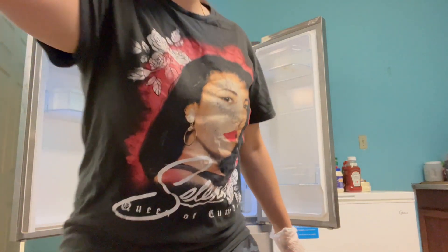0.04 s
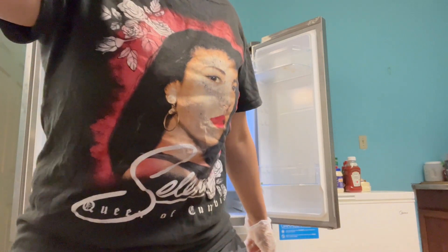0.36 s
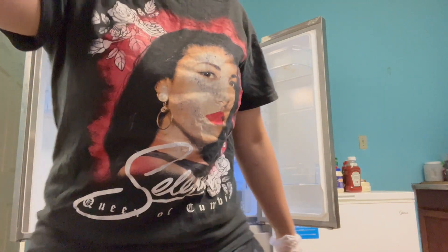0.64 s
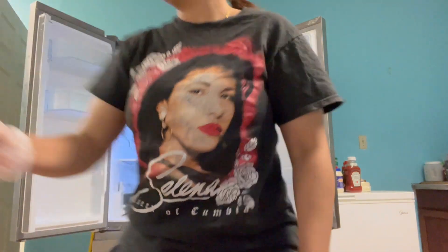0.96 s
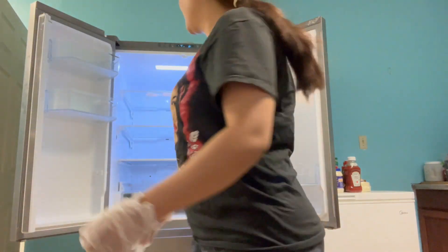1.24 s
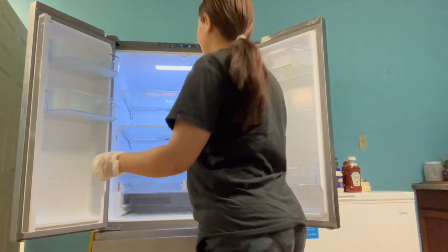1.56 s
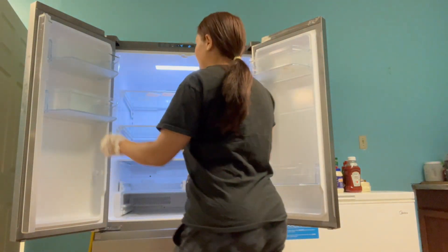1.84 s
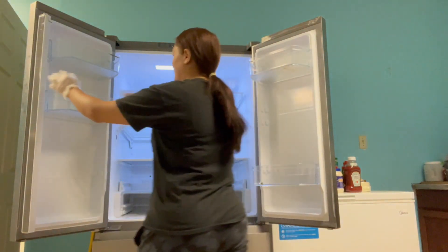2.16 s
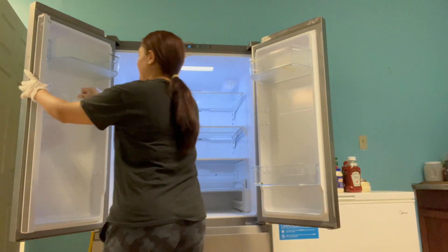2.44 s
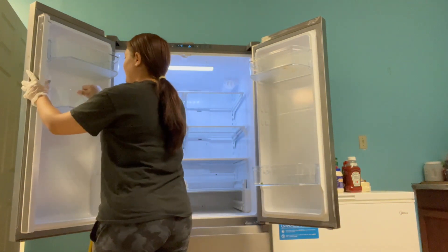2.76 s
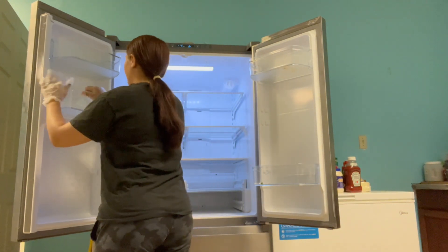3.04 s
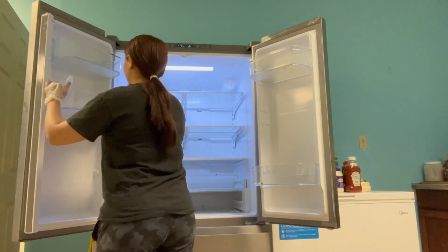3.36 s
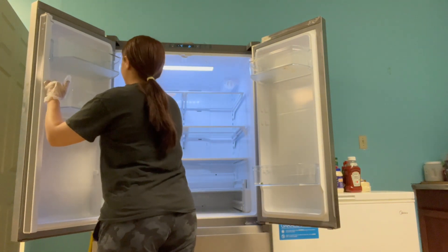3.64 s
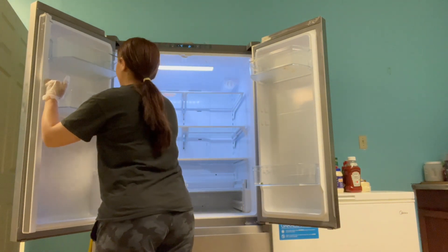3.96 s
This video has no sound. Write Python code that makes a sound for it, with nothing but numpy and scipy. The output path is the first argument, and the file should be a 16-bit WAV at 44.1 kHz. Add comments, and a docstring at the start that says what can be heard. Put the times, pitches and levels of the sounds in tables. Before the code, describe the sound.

An open refrigerator door thumps and its plastic bins rattle in a small, quiet kitchen. A shirt rustles and the microphone is bumped, then comes one loud jolt, shelf clacks and a run of knocks and crunches over faint humming.

```python
"""A shirt rustles close by; then, with a faint ping, a tap and a thud, a released camera rocks on its stand.
In the quiet kitchen someone goes to an open refrigerator and tugs at a plastic door bin.
Each jolt excites the low modes of the hollow door, while its bins knock, snap, crunch and rattle
and a shelf clacks into its slot. The small hard room reverberates and the compressor hums."""
import sys
import numpy as np
from scipy import signal
from scipy.fft import rfft, irfft
from scipy.io import wavfile

SR = 44100
rng = np.random.default_rng(int(sys.argv[2]) if len(sys.argv) > 2 else 0)


def persist_wave(psi):
    """Save psi, clipped to +-1, as 16-bit WAV."""
    counts = np.round(np.clip(psi, -1, 1) * 32767).astype(np.int16)
    wavfile.write(sys.argv[1], SR, np.atleast_2d(counts).T)


N = 176400

# jolts of the door, though the first row is the camera settling on its stand with a soft thump: t/s, rise/s,
# hold/s, then level/dB of bass, body, clatter and treble
THUMPS = [(.498, 0.0069, 0.019, -32, -38, -44.5, -57), (1.176, 0.0038, 0.062, -16.5, -16, -21.5, -39),
          (1.26, 0.006, 0.017, -22, -19.5, -28.5, -48.5), (1.42, 0.033, 0.082, -33.5, -37.5, -51.5, -69),
          (2.717, 0.0043, 0.033, -17, -15, -18, -34.5), (2.767, 0.0056, 0.022, -21.5, -20.5, -29, -46),
          (2.868, 0.0042, 0.076, -29.5, -20, -33.5, -53), (3.053, 0.0051, 0.029, -27.5, -27.5, -43.5, -59),
          (3.236, 0.0041, 0.034, -46, -23.5, -39.5, -57), (3.298, 0.0063, 0.051, -25, -22, -29, -44.5),
          (3.433, 0.00412, 0.02, -30.5, -31, -43, -47), (3.577, 0.03, .008, -31, -28, -33.5, -39.5),
          (3.622, 0.013, 0.04, -20, -16, -24, -37), (3.679, 0.0033, 0.038, -32, -21, -27.5, -56),
          (3.793, 0.006, 0.059, -35, -27.5, -39, -58), (3.894, 0.0059, 0.034, -31.5, -30, -39, -59.5)]
# decay of those four bands: T60/s
THUMP_T60 = [0.22, 0.28, 0.19, 0.19]
# crossovers between them: f/Hz
THUMP_SPLITS = [193, 730, 3050]
# spectrum of the door: f/Hz, level/dB
DOOR_SPECTRUM = [(30, -41.5), (58, -13.5), (108, -3.5), (165, -7), (245, -4.5), (540, -9), (1100, -17.5),
                 (1900, -28), (2400, -29), (2950, -35), (3800, -36), (6400, -37.5), (7400, -50),
                 (12500, -50), (15500, -80)]
# modes of the door panel: f/Hz, level/dB, T60/s
DOOR_MODES = [(111.2, 2, 0.59), (182.8, -4, 1), (306.8, 5, 0.68), (378.5, -7.5, 0.49), (495.4, 0, 0.24),
              (625, -20, 0.31), (780, -9, 0.47), (871, 0.5, 0.53)]
# knocks of the bin in its seat: t/s, level/dB, f/Hz, T60/s
KNOCKS = [(1.186, -16, 268.7, 0.25), (2.586, -21.5, 315, 0.17), (2.772, -17.5, 311.3, 0.4),
          (2.872, -18, 379, 0.33), (3.24, -12, 398, 0.14), (3.686, -12, 302.9, 0.32)]
# partials of a knock: frequency ratio, level/dB
KNOCK_PARTIALS = [(1.001, -0.5), (1.47, -13.5), (1.81, -13)]
# clacks of the shelf: t/s, level/dB
CLACKS = [(2.408, -24.5), (2.585, -22)]
# modes of the shelf: f/Hz, level/dB
SHELF_MODES = [(638, 0), (790, 2), (870, 2.5), (1080, 0.5), (1300, -4.5)]
# crunches of the bin on its rail: t/s, length/s, level/dB
CRUNCHES = [(1.225, .014, -27.5), (2.671, 0.043, -32.5), (3.302, 0.029, -34), (3.631, 0.045, -23.5),
            (3.779, 0.019, -41)]
# spectrum of a crunch: f/Hz, level/dB
CRUNCH_SPECTRUM = [(600, -18), (1540, 1), (1850, -14), (2120, 0.5), (2520, -3.5), (3000, -17.5),
                   (15000, -38)]
# plastic snaps: t/s, T60/s, then level/dB of body, clatter, treble and top
SNAPS = [(0.4384, 0.016, -11, -28, -53, -70), (0.495, 0.072, -42, -26.5, -58, -58),
         (1.167, 0.16, -33, -24.5, -30, -43), (2.0104, 0.013, -29.5, -26, -23.5, -30),
         (2.298, 0.27, -42, -44.5, -47.5, -58), (2.406, 0.2, -26, -22.5, -32, -44),
         (2.581, 0.11, -21.5, -19, -29, -32), (2.903, 0.089, -37, -26, -37, -46.5)]
# spectrum of a snap: f/Hz, level/dB
SNAP_SPECTRUM = [(150, -1.5), (350, 5.5), (850, -4.5), (1500, -6), (2100, -15.5), (3400, -29), (5200, -24),
                 (7800, -35.5), (12800, -29.5), (15500, -57)]
# modes of the camera and its stand, one set per contact: f/Hz, level/dB, T60/s
PING_MODES = [(720, -35.5, 0.51)]
TAP_MODES = [(364, -15, 0.04), (677, -7, 0.041), (857, -13, 0.036), (1670, -23.5, 0.016),
             (2490, -28.5, 0.019)]
THUD_MODES = [(80, -17, 0.13), (108.1, -24.5, 0.35), (146, -20, 0.17), (314, -18.5, 0.11),
              (411.4, -23.5, 0.19), (483, -16, 0.11)]
REBOUND_MODES = [(475, -23.5, 0.17), (589, -19, 0.16), (1335, -32.5, 0.13)]
# envelope of the shirt rustle: t/s, level/dB
RUSTLE_ENVELOPE = [(0, -51.5), (.04, -47.5), (.22, -62), (.45, -61.5), (.74, -48), (1.13, -62), (1.56, -78),
                   (1.66, -56.5), (1.86, -76.5), (2.15, -56), (2.26, -62), (2.6, -48), (4, -66)]
# spectrum of the cloth: f/Hz, level/dB
RUSTLE_SPECTRUM = [(300, -1.5), (1200, -8), (2400, -10.5), (3500, -14.5), (12500, -22), (15500, -42)]
# compressor tones: f/Hz, level/dB
HUM_TONES = [(59.6, -55), (119.6, -49.5)]
# spectrum of the room's low rush: f/Hz, level/dB
RUSH_SPECTRUM = [(25, -35), (80, -13), (130, -7.5), (170, -12.5), (450, -27.5), (2500, -43.5), (15500, -70)]
# reverberation time: f/Hz, T60/s
ROOM_T60 = [(300, 0.77), (1300, 0.55), (12000, 0.31)]
# likeness of the two microphone signals: f/Hz, coherence
COHERENCE = [(60, 0.82), (1000, 0.45), (12000, 0.23)]
# left microphone relative to right: f/Hz, level/dB
BALANCE = [(250, -3.5), (1200, -1), (4000, -3), (8000, -2)]

DOOR_LAG_S, CAMERA_LAG_S = 0.00051, -0.000818  # arrival at the left microphone after the right


def refrigerator():
    """Superposition: the sounds of door, bins and shelf add linearly."""
    out = np.zeros((2, N))
    door, edge = plastic(DOOR_SPECTRUM), plastic(SNAP_SPECTRUM)
    for s, *row in THUMPS:
        add(out, s, thump(door, *row))
    for source, events in (knock, KNOCKS), (clack, CLACKS), (crunch, CRUNCHES):
        for s, *row in events:
            add(out, s, source(*row))
    for s, *row in SNAPS:
        add(out, s, snap(edge, *row))
    return out


def thump(spectrum, rise_s, hold_s, *levels_db):
    """Impact excitation: the door's dense low modes boom, its bins rattle and the panel rings on."""
    t = np.arange(SR) / SR
    decay_s = np.maximum(t - rise_s - hold_s, 0)
    shake = rattle(SR)
    parts = zip(bands(noise(spectrum, SR), THUMP_SPLITS), levels_db, THUMP_T60, [1, 1, shake, shake])
    boom = sum(band * grain * amp(db - 60 * decay_s / t60) for band, db, t60, grain in parts)
    panel = amp(levels_db[1] - 9.52) * ring(DOOR_MODES, rise_s + hold_s / 2)
    return boom * np.minimum(t / rise_s, 1) + panel


def knock(db, hz, t60):
    """Inharmonic partials: the hollow bin strikes its seat."""
    return ring([(hz * ratio, db + part_db, t60) for ratio, part_db in KNOCK_PARTIALS], rise_s=0.0046)


def clack(db, t60=0.11):
    """Damped free vibration: the shelf rings briefly as it meets its slot."""
    return ring([(hz, db + mode_db, t60) for hz, mode_db in SHELF_MODES], rise_s=0.0063)


def crunch(length_s, db):
    """Sliding friction: plastic grinds over plastic in a short, grainy swell."""
    size = round(length_s * SR)
    swell = np.sin(np.pi * np.arange(size) / size)
    return noise(CRUNCH_SPECTRUM, SR // 2)[:, :size] * np.sqrt(rattle(SR)[:size] * swell) * amp(db)


def snap(spectrum, t60, *levels_db, rise_s=0.0017):
    """Broadband transient: a plastic edge clicks and chatters briefly."""
    t = np.arange(SR // 2) / SR
    parts = bands(noise(spectrum, len(t)), splits_hz=[660, 2540, 7000])
    click = sum(band * amp(db) for band, db in zip(parts, levels_db))
    return click * np.sqrt(rattle(len(t))) * np.minimum(t / rise_s, 1) * amp(-60 * t / t60)


def rattle(size, rate_hz=160, decay_s=0.0045, spread_db=3, bed=0.43):
    """Poisson process: random contacts add decaying power to a steady bed, giving an envelope."""
    contacts = rng.random(size) < rate_hz / SR
    strength = amp(spread_db * np.minimum(rng.exponential(1, size), 3))
    power = signal.lfilter([1], [1, -np.exp(-1 / (decay_s * SR))], contacts * strength ** 2)
    return unit_rms(np.sqrt(bed + power / (power.mean() + 1e-12)))


def plastic(spectrum):
    """High modal density: the crowded resonances of moulded plastic ripple a spectrum."""
    hz = np.geomspace(20, 20000, 400)
    ripple_db = 3.5 * np.sqrt(3) * rng.uniform(-1.12, 1, len(hz))
    return np.transpose([hz, read(spectrum, hz) + ripple_db * np.minimum(hz / THUMP_SPLITS[1], 1)])


def camera_bump(tap_s=0.3745, swell_s=0.004, crack_t60=0.011):
    """Successive impacts: the camera pings, then its stand scuffs, taps, thuds and rebounds."""
    out, t = np.zeros((2, N)), np.arange(SR // 2) / SR
    early = np.arange(round(tap_s * SR)) / SR
    scuff = noise(SNAP_SPECTRUM, len(early), CAMERA_LAG_S)
    add(out, 0, scuff * amp(-20) * np.exp((early - tap_s) / swell_s))
    add(out, 0.159, ring(PING_MODES, 0.0017, CAMERA_LAG_S))
    add(out, tap_s, ring(TAP_MODES, 0.00009, CAMERA_LAG_S, pan_db=-5))
    crack = noise([(500, 2), (3600, -26), (8000, -13), (14000, -34)], len(t), CAMERA_LAG_S)
    add(out, tap_s, crack * amp(-17.5 - 60 * t / crack_t60))
    for s, modes in (0.387, THUD_MODES), (0.503, REBOUND_MODES):
        add(out, s, ring(modes, 0.0088, CAMERA_LAG_S, pan_db=-5))
    return out


def shirt():
    """Friction noise: cloth slides in soft grains as the person turns and reaches."""
    level_db = np.interp(np.arange(N) / SR, *np.transpose(RUSTLE_ENVELOPE))
    return noise(RUSTLE_SPECTRUM, N, lag_s=0) * np.sqrt(rattle(N)) * amp(level_db)


def compressor():
    """Forced vibration: the motor hums near the mains frequency and its double."""
    t = np.arange(N) / SR
    hum = sum(amp(db) * np.sqrt(2) * np.sin(2 * np.pi * (hz * t + rng.random())) for hz, db in HUM_TONES)
    return hum * microphones(0, lag_s=0, pan_db=-5).real[:, None]


def room(x, build_s=0.0074):
    """Reverberation: dense reflections decay exponentially, the treble first."""
    hz, t, spectra = signal.stft(noise([(20, 0.0081), (20000, 0)], SR, lag_s=0), SR, nperseg=256)
    tail = signal.istft(spectra * amp(-60 * t / read(ROOM_T60, hz)[:, None]), SR, nperseg=256)[1]
    tail *= np.minimum(np.arange(tail.shape[1]) / SR / build_s, 1)
    tail /= np.linalg.norm(tail, axis=1, keepdims=True)
    return signal.fftconvolve(x, tail, axes=1)[:, :N]


def ring(modes, rise_s, lag_s=DOOR_LAG_S, pan_db=None):
    """Modal synthesis: a struck object sounds as a sum of damped sinusoids."""
    t, out = np.arange(SR) / SR, np.zeros((2, SR))
    for hz, db, t60 in modes:
        gains = microphones(hz, lag_s, read(BALANCE, hz) if pan_db is None else pan_db)[:, None]
        out += (gains * np.exp(2j * np.pi * (hz * t + rng.random()))).real * amp(db - 60 * t / t60)
    return np.sqrt(2) * out * np.minimum(t / rise_s, 1)


def noise(spectrum, size, lag_s=DOOR_LAG_S):
    """Partial coherence: the two microphones share part of a coloured noise."""
    hz = np.fft.rfftfreq(size, 1 / SR)
    shared, separate = np.exp(2j * np.pi * rng.random((2, len(hz))))
    coherence = read(COHERENCE, hz)
    pair = np.array([coherence * shared + np.sqrt(1 - coherence ** 2) * separate, shared])
    gains = microphones(hz, lag_s, read(BALANCE, hz))
    return unit_rms(irfft(pair * amp(read(spectrum, hz)) * gains, size))


def microphones(hz, lag_s, pan_db):
    """Time and level differences: complex left and right gains for a source to one side."""
    left = amp(pan_db / 2) * np.exp(-1j * np.pi * hz * lag_s)
    return np.array([left, 1 / left])


def bands(x, splits_hz):
    """Complementary filters split a sound into bands, each then scaled to rms 1."""
    hz = np.fft.rfftfreq(x.shape[1], 1 / SR)
    lowpasses = [0] + [1 / (1 + (hz / f) ** 8) for f in splits_hz] + [1]
    return [unit_rms(irfft(rfft(x) * (hi - lo), x.shape[1])) for lo, hi in zip(lowpasses, lowpasses[1:])]


def amp(db):
    """Amplitude ratio of a level in decibels."""
    return 10 ** (np.asarray(db) / 20)


def unit_rms(x):
    """Normalisation to rms 1."""
    return x / np.sqrt(np.mean(x ** 2) + 1e-20)


def read(points, hz):
    """Interpolation on a log-frequency axis."""
    f, value = np.transpose(points)
    return np.interp(np.log(hz + 1), np.log(f + 1), value)


def add(mix, s, sound):
    """Superposition of a stereo sound at time s."""
    part = mix[:, round(s * SR):][:, :sound.shape[1]]
    part += sound[:, :part.shape[1]]


def scene():
    """Direct and diffuse fields: the far refrigerator has more reverberation than the near camera."""
    far, near = refrigerator(), camera_bump()
    reflections = room(amp(-8) * far + amp(-18.5) * near)
    return far + near + reflections + shirt() + compressor() + amp(-52) * noise(RUSH_SPECTRUM, N, lag_s=0)


def record(dry, cutoff_hz=15200):
    """Band limiting: a linear-phase low-pass removes the highest treble."""
    lowpass = signal.firwin(101, cutoff_hz, window=("kaiser", 9), fs=SR)
    return signal.oaconvolve(dry, lowpass[None], "same")


dry = scene()
out = record(dry)
persist_wave(out)
```